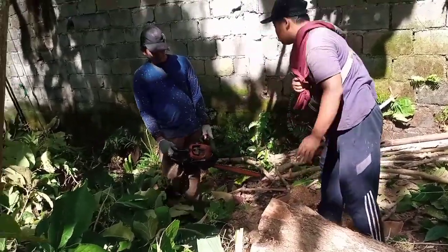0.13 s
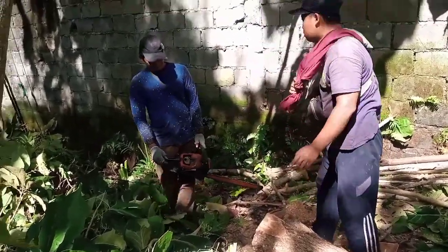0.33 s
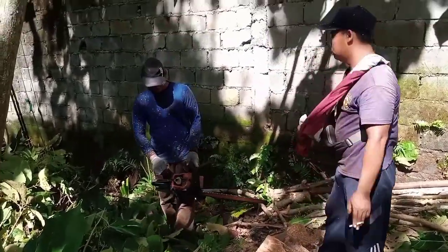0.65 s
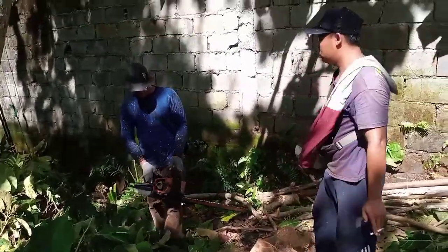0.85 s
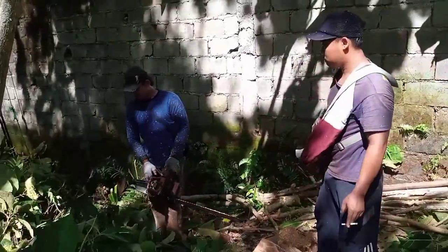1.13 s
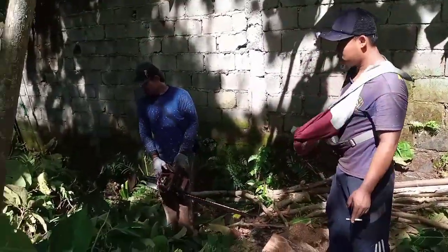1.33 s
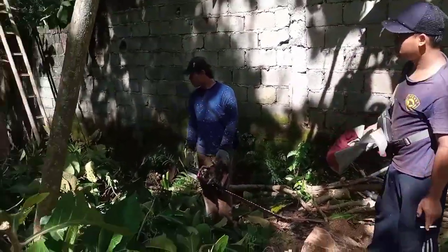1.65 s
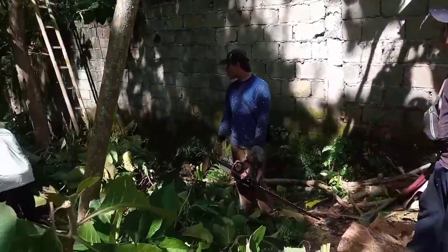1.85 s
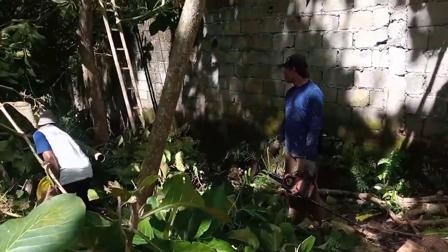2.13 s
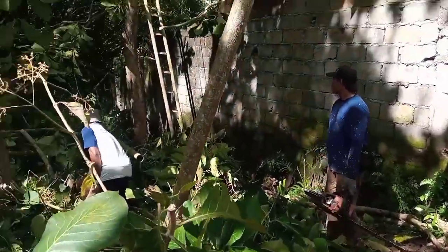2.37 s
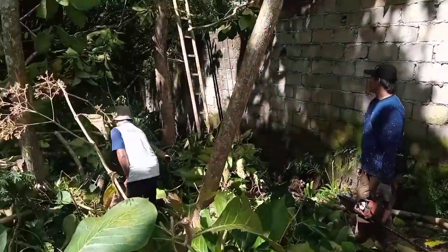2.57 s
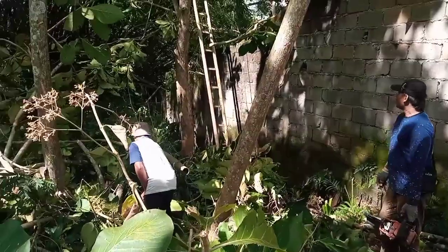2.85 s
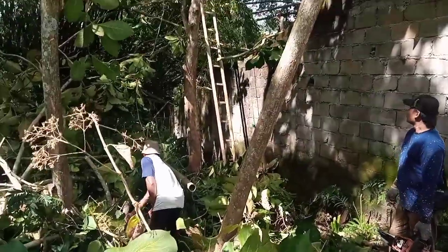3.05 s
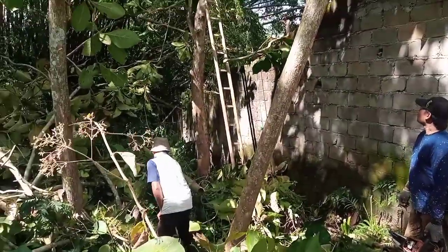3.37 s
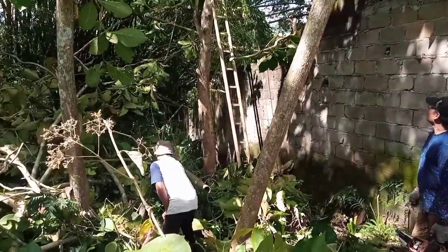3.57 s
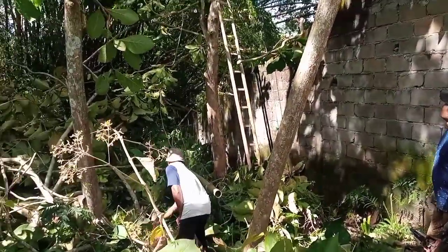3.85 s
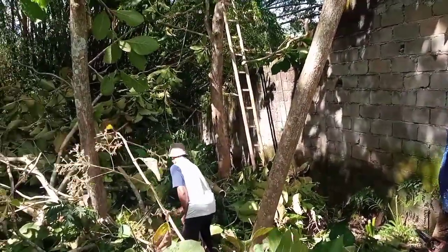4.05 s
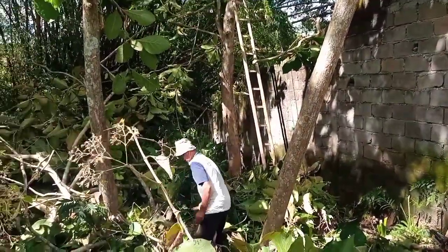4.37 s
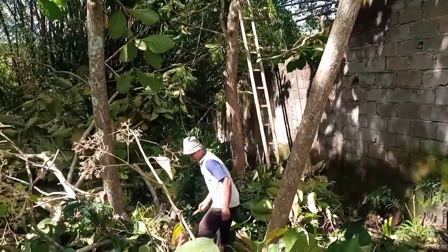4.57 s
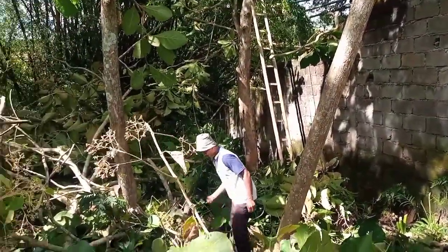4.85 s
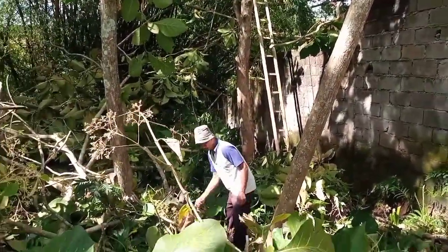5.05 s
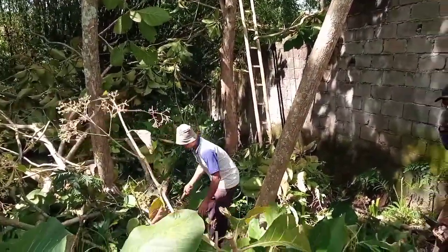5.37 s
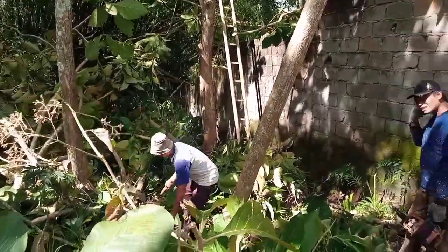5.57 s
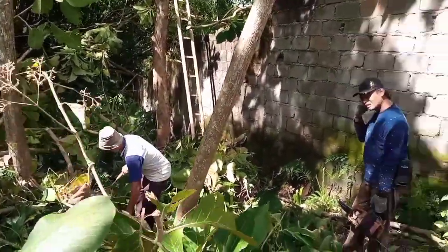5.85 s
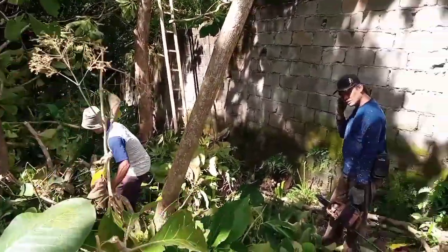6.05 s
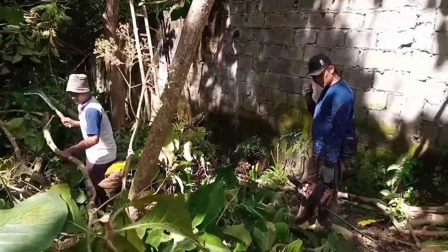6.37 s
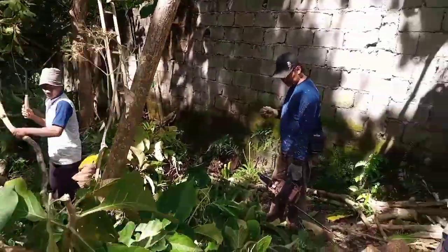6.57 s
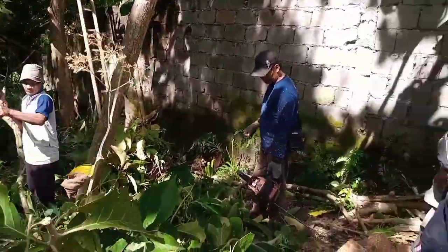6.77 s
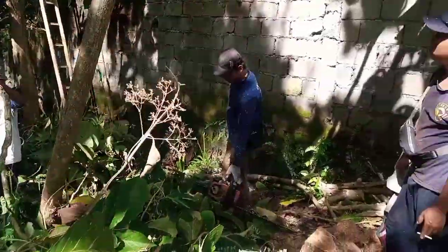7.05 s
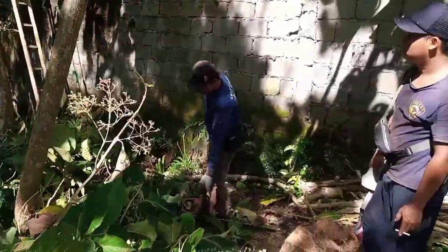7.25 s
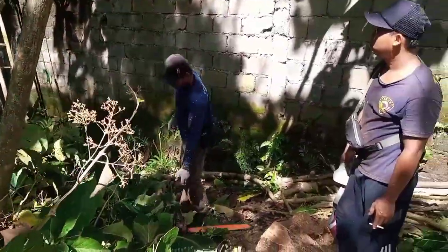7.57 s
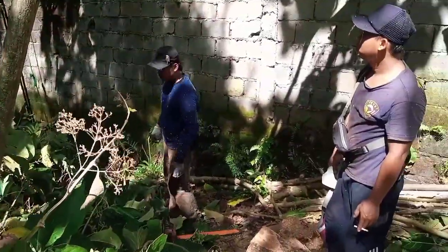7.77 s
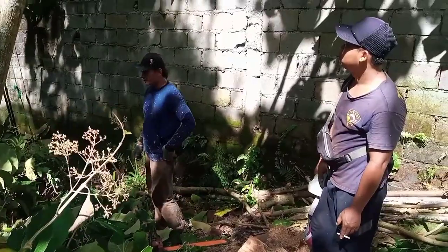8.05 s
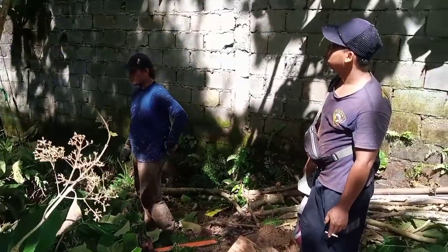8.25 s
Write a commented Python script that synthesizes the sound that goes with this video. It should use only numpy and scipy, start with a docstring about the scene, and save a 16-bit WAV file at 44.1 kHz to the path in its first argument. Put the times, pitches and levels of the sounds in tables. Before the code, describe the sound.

Rough two-stroke chainsaw idling down to silence beside a wall, followed by wooden knocks, snapping stems, leafy rustling and a steady high insect whine outdoors.

```python
"""A two-stroke chainsaw runs unevenly beside a block wall, is switched off and coasts down to a few last chuffs.
A cicada whines in slow sweeps, a far bird whistles faintly twice, and leafy brush cracks, thuds and rustles.
Each turn of the saw's crank sends pressure puffs through ringing filters; the brush is shaped noise and snaps.
Cicada and bird are gliding tones, roughened on their way through leaves. Both channels are the same."""
import sys
import numpy as np
from scipy import signal
from scipy.fft import rfft, irfft, next_fast_len
from scipy.io import wavfile
from scipy.ndimage import uniform_filter1d, map_coordinates

SR = 44100
rng = np.random.default_rng(int(sys.argv[2]) if len(sys.argv) > 2 else 0)


def digitize_waveform(pressure):
    """Quantize a signal to 16-bit integers and store it at the path in sys.argv[1].

    Rows of a 2-D input are taken as channels; values are limited to [-1, 1].
    """
    field = np.atleast_2d(pressure).T
    bounded = np.clip(field, -1, 1)
    quanta = np.round(bounded * 32767).astype(np.int16)
    wavfile.write(sys.argv[1], SR, quanta)


N = 370919
TIME = np.arange(N) / SR  # seconds

# All dB levels are relative: gains inside the functions come on top.
# "Die-away" is the time a sound takes to fall by 60 dB.

# The crank while the engine fires. Each row: time in seconds, speed in turns per second.
CRANK_SPEED = [(0, 73.4), (.62, 73.7), (1.009, 72.7)]
# Hard firings that restart the every-other-turn rhythm. Each row: time in seconds, rasp level in dB.
HARD_FIRINGS = [(.0125, -12.5), (.1075, -22), (.273, -13), (.331, -13), (.369, -51), (.450, -12),
                (.490, -46), (.626, -19.5), (.707, -19), (.749, -26), (.817, -49), (.844, -19),
                (.967, -10.5)]
# Pumping strength as the throttle closes. Each row: time in seconds, level in dB.
PUMP_LEVEL = [(.3, -12), (.9, -8), (1.06, -1.5), (1.22, 1.5), (1.37, -2.5)]
# Puffs in each turn as the ports open and close.
# Each row: place as a share of the turn, level in dB at full speed.
PORT_PUFFS = [(0, -1.5), (0.371, -1), (0.682, -11)]
# Ring of crankcase and fins. Each row: frequency in Hz, level in dB.
CASING_TONES = [(1880, -3), (2250, 0), (3260, 2.5), (3450, -3.5), (4300, -2), (4960, -6.5), (6680, -6.5)]
# How loudly the casing rings. Each row: time in seconds, level in dB.
CASING_LEVEL = [(.9, -37.5), (1.08, -33.5), (1.4, -33.5)]
# Blows in the brush. Each row: start in seconds, crack level in dB, thud level in dB,
# rustle level in dB, rustle die-away in seconds.
CHOPS = [(2.310, -17, -24, -26.5, 0.89), (2.596, -49, -28, -38, 0.97), (2.661, -50, -32.5, -49, 0.73),
         (3.055, -16, -44, -24.5, 0.55), (3.816, -14, -27, -24, 1), (5.097, -28, -47, -30.5, 0.89),
         (5.985, -24, -24, -34, 0.97), (7.389, -19.5, -25, -27, 1), (8.078, -22.5, -26, -23, 0.45),
         (8.279, -16, -22, -26, 0.94)]
# Snapping sticks and knocks on wood. Each row: start in seconds, tick level in dB,
# tick die-away in seconds, knock level in dB, knock frequency in Hz.
CLICKS = [(1.809, -25, 0.028, -12.5, 626), (1.873, -14, 0.018, 0, 490), (2.112, -26, 0.1, -51, 500),
          (3.844, -16, 0.021, -34, 850), (4.662, -35, 0.043, -20.5, 1200), (5.103, -10.5, 0.013, -9.5, 790),
          (6.16, -38, .03, -17, 2170), (5.76, -33, .04, -14, 990), (6.527, -27, 0.097, -14.5, 373),
          (8.235, -53, 0.022, -17, 156)]
# Branches pushed aside. Each row: time of the height in seconds, swell and fade length in seconds,
# leaf hiss level in dB, twig crackle level in dB.
STIRS = [(1.93, 0.2, -44.5, -44.5), (2.07, 0.025, -35, -93), (2.78, 0.16, -44, -46),
         (3.01, 0.036, -41, -45), (4.88, 0.069, -43.5, -47.5), (5.17, 0.036, -28.5, -63),
         (5.36, 0.14, -37, -48), (5.7, 0.043, -36, -54), (6.32, 0.31, -34, -38.5), (6.39, 0.03, -28, -36),
         (6.95, 0.17, -36.5, -40.5), (7.25, 0.14, -39, -41.5), (7.63, 0.29, -38.5, -45),
         (8.38, 0.058, -35, -34.5)]
# The cicada as the microphone turns towards its tree and back. Each row: time in seconds,
# fundamental level in dB, octave level in dB, top partial level in dB.
CICADA_LEVELS = [(0, -52, -58, -59), (1.0, -48, -56, -55), (1.8, -56, -56, -45), (2.27, -39, -57, -40),
                 (2.9, -45, -45, -39), (3.25, -38, -46, -37), (4.4, -39, -39.5, -35.5),
                 (5.7, -36.5, -42.5, -36.5), (6.0, -50, -49, -39), (6.6, -44, -48, -43),
                 (7.25, -47, -56, -46.5), (7.5, -42, -56, -49), (8.4, -48, -49, -47)]
# One sweep of its song. Each row: time into the sweep in seconds, pitch in Hz.
CICADA_SWEEP = [(0, 3418), (.5, 3453), (.6, 3452), (1.0, 3426), (1.47, 3402), (1.488, 3418)]
# Side tones of the cicada's sound-making ribs, the tymbal. Each row: multiple of the pitch,
# distance from it in buzz steps, level in dB against that partial.
SIDE_TONES = [(1, 1, -15), (2, -1, -20), (2, -2, -20), (4, -1, -15), (4, 1, -18)]
# Song arriving by way of swaying leaves. Each row: multiple of the pitch, scattered over direct sound in dB.
LEAF_SCATTER = [(1, -17), (2, -12), (4, -6)]
# Whistles of a far bird. Each row: start in seconds, length in seconds, first pitch in Hz,
# last pitch in Hz, level in dB, speed of the random blur in Hz.
BIRD_CALLS = [(2.18, 0.14, 2750, 2400, -51, 450), (3.337, 0.3, 3100, 2350, -49, 450)]

# Spectra of the sounds. Each row: frequency in Hz, density in dB per Hz (only the shape counts).
FIRING_SPECTRUM = [(60, -67), (100, -26.5), (165, -12.5), (250, -10.5), (292, -7.5), (345, -18), (465, 2),
                   (540, -13), (800, 1.5), (900, -3.5), (1050, -3.5), (1700, -28), (9000, -65)]
PUMPING_SPECTRUM = [(45, -57), (175, -7), (420, 0.5), (590, -11.5), (735, 6), (810, -7.5), (880, 0.5),
                    (1100, -8), (1750, -23.5), (9000, -56)]
SHOVE_SPECTRUM = [(55, -48), (105, -8), (170, 5), (1500, -58)]
CHUFF_SPECTRUM = [(45, -54.5), (130, -5), (400, -2.5), (550, -16), (860, -0.5), (1300, -23.5),
                  (12000, -46.5)]
METAL_SPECTRUM = [(300, 0), (1300, 5), (2250, 3.5), (2800, -5), (3400, 3.5), (6800, -1), (13000, -23.5)]
CHAIN_SPECTRUM = [(1300, -22), (2200, 3), (3900, -8), (4400, 7), (5000, -6), (6000, -35.5)]
JINGLE_SPECTRUM = [(1000, -5.5), (4500, -8.5), (6300, 1), (13000, -30.5)]
CRACK_SPECTRUM = [(400, -10.5), (900, 1.5), (6700, 6.5), (8500, -3), (15000, -30)]
THUD_SPECTRUM = [(35, -51), (80, -0.5), (150, 1.5), (330, -3.5), (520, -16), (900, -4.5), (4000, -49.5)]
LEAF_SPECTRUM = [(500, -49.5), (1800, -4.5), (4500, -1), (6600, 5), (10000, -17), (15000, -23.5)]
TWIG_SPECTRUM = [(100, -35), (230, -1), (2200, 0.5), (7000, -24)]
RUMBLE_SPECTRUM = [(25, -65), (50, -6), (120, 1.5), (330, -2.5), (480, -25), (4000, -23.5)]
# Echo between trunks and masonry. Each row: frequency in Hz, die-away in seconds.
YARD_DECAY = [(150, 0.49), (8000, 0.068)]

# Once the ignition is cut, friction brakes the crank evenly.
CUT_S, BRAKE_HZ_PER_S = 1.009, 97.4
# Slow hunting and turn-to-turn scatter of the crank while it fires.
HUNT_TURNS, JITTER_TURNS = .028, .011
# Levels of combustion, plain pumping, the late shoves of gas and the hiss of each firing.
FIRING_DB, PUMPING_DB, SHOVE_DB, SPIT_DB = -19, -22.5, -33.5, -32.5
# Turbulence in a firing, against its clean pressure spike.
FIRING_ROUGH = .45
# The slower the piston, the more gas each stroke shoves: power of the slowness.
SHOVE_POWER = 2.1
# The muffler's resonances sink as its gas cools: share lost per second while firing.
COOLING_PER_S = 0.028
# The wall's echo comes later and later as the saw is moved.
WALL_S, WALL_DRIFT_S_PER_S = 0.00615, 0.00049
# Piston clatter at full speed, and the power of the speed it follows.
CLATTER_DB, CLATTER_POWER = -30.5, 0.23
# The chain runs on round the bar at first: level, when it stops, how long the fade takes.
CHAIN_DB, CHAIN_STOP_S, CHAIN_FADE_S = -26, 0.27, 0.16
# Last compression strokes: the first, the gap after it, each gap over the one before.
CHUFF_S, CHUFF_GAP_S, CHUFF_SLOWING = 1.399, .035, 1.198
# The first puff, and what each later stroke loses.
PUFF_DB, PUFF_LOSS_DB = -10, 0.75
# Jingle on the third stroke, its rise per stroke up to there and fall per stroke after.
JINGLE_DB, JINGLE_RISE_DB, JINGLE_FALL_DB = -20.5, 4.5, 3
# Leaves that never quite settle, and unevenness of the stirred brush and of the shaken foliage.
LEAF_FLOOR_DB, FITS_DB, TAIL_FITS_DB = -47.5, 1.5, 1.1
# How far single leaves and twigs stand out in the rustle.
PATCHY_DB, TWIG_PATCHY_DB = 1.5, 2.4
# Start of a cicada sweep; how fast its scattered paths change;
# dB more scatter for each dB the top partial loses.
SWEEP_START_S, FADING_HZ, OFF_AXIS_SHARE = .155, 13, .45
# How long far sounds linger among the trees; upper limit of the finished sound.
GROVE_T60_S, TOP_HZ = .7, 15700


def engine():
    """Every turn pumps puffs through the muffler; about every other turn fires, until the ignition is cut."""
    speed, turns, turn, ignition, angle, strokes = crank()
    fires, lit = firing_pattern(turns, turn, ignition)
    # sound travels more slowly in cooler gas, so the muffler rings on a slowing clock
    clock = np.cumsum(1 - COOLING_PER_S * np.minimum(TIME, CUT_S)) / SR
    slowness = speed[0] / np.interp(strokes, TIME, speed)
    bark = combustion(strokes, fires, clock)
    pump = pumping(angle, turns, strokes, ignition, slowness, clock)
    shove = colour(impulses(strokes, ~ignition * slowness ** SHOVE_POWER), SHOVE_SPECTRUM)
    exhaust = amp(FIRING_DB) * unit(bark) + amp(PUMPING_DB) * unit(pump) + amp(SHOVE_DB) * unit(shove)
    running_share = strokes[-1] * SR / N  # part of the scene in which the crank turns
    gas_and_casing = np.sqrt(running_share) * (exhaust + casing(turn, turns))
    return gas_and_casing + clatter(speed, turns, strokes[lit & ignition])


def crank():
    """Follow the crank: firing, it hunts and no two turns are alike; coasting, it slows smoothly."""
    braking = BRAKE_HZ_PER_S * np.maximum(TIME - CUT_S, 0)
    speed = np.maximum(curves(CRANK_SPEED)[0] - braking, 0)
    turns = np.cumsum(speed) / SR + .05
    last_turn = int(np.interp(CHUFF_S - CHUFF_GAP_S / 2, TIME, turns))
    turn = np.arange(1, last_turn + 1)
    ignition = np.interp(turn, turns, TIME) < CUT_S + .5 / speed[0]
    hunting = HUNT_TURNS * wobble(11)[(turn * SR / speed[0]).astype(int)]
    jitter = JITTER_TURNS * rng.standard_normal(len(turn))
    angle = turn + ignition * (hunting + jitter)
    strokes = np.interp(angle, turns, TIME)  # seconds
    return speed, turns, turn, ignition, angle, strokes


def firing_pattern(turns, turn, ignition):
    """A hard firing follows a miss; then each firing needs one turn to clear its burnt gas."""
    hard_turn = np.round(np.interp([s for s, _ in HARD_FIRINGS], TIME, turns))
    latest = np.maximum(np.searchsorted(hard_turn, turn, "right") - 1, 0)
    since = turn - hard_turn[latest]
    lit = (since % 2 == 0) & ~np.isin(turn + 1, hard_turn)
    weak = .26 * amp(2.5 * rng.standard_normal(len(turn)))
    fires = ignition * np.where(lit, 1, weak) * amp(rng.standard_normal(len(turn)))
    return fires, lit


def combustion(strokes, fires, clock):
    """Pressure spikes of the firings ring the muffler and bounce off the wall."""
    spikes = puffs(np.interp(strokes, TIME, clock), fires, rough=FIRING_ROUGH)
    bark = np.interp(clock, TIME, colour(spikes, FIRING_SPECTRUM))
    bark = baffle(bark, hz=950, q=1.65)
    bark = wall(bark, delay=WALL_S + WALL_DRIFT_S_PER_S * TIME, echo_db=-6)
    return yard(bark, wet_db=-9)


def pumping(angle, turns, strokes, ignition, slowness, clock):
    """As the throttle closes, plain pumping takes over; its weaker puffs fade most as the crank slows."""
    gas = amp(np.interp(strokes, *np.transpose(PUMP_LEVEL)))
    ports = np.zeros(N)
    for share, db in PORT_PUFFS:
        scatter = amp(np.where(ignition, 2, .6) * rng.standard_normal(len(angle)))
        times = np.interp(angle + share, turns, clock)
        ports += impulses(times, gas * amp(db * slowness) * scatter)
    ringing = colour(chamber(ports, hz=423, feedback=0.44), PUMPING_SPECTRUM)
    pump = np.interp(clock, TIME, ringing)
    return yard(baffle(pump, hz=600, q=.9), wet_db=-14)


def puffs(times, sizes, rough):
    """Pressure spikes, each with a short wake of turbulent gas."""
    spikes = impulses(times, sizes)
    decay = np.exp(-1 / (0.006 * SR))
    wake = signal.lfilter([1], [1, -decay], spikes) * rng.standard_normal(N)
    return spikes + rough * wake * np.linalg.norm(spikes) / np.linalg.norm(wake)


def chamber(x, hz, feedback):
    """Sound runs to and fro in the muffler can, so that it rings on between puffs."""
    loop = np.zeros(round(SR / hz))
    loop[0], loop[-1] = 1, -feedback
    return signal.lfilter([1], loop, x)


def baffle(x, hz, q):
    """The muffler turns over the band round its resonance, so each puff swells for a cycle or two."""
    return x - 2 * signal.lfilter(*signal.iirpeak(hz, q, SR), x)


def casing(turn, turns):
    """Knocks at the same crank angles in every turn ring the metal, so fine overtones glide with the crank."""
    tones = sum(amp(db) * np.sin(2 * np.pi * hz * TIME) for hz, db in CASING_TONES)
    ring = burst(0, .0001, 0.029) * tones
    knocks = np.zeros(N)
    for share in (0, .21, .47, .76):
        sizes = amp(rng.standard_normal(len(turn)))
        knocks += impulses(np.interp(turn + share, turns, TIME), sizes)
    return amp(curves(CASING_LEVEL)[0]) * unit(signal.oaconvolve(knocks, ring[:SR])[:N])


def clatter(speed, turns, firing_times):
    """Piston and chain rattle once a turn; every regular firing spits, and hard firings rasp."""
    slap = unit(1 + np.exp(-(turns % 1) / 1.5))
    fade = np.clip((CHUFF_S - TIME) * 10 + 1, 0, 1)
    rattle = amp(CLATTER_DB) * (speed / speed[0]) ** CLATTER_POWER * slap * fade
    spit = amp(SPIT_DB) * sum(burst(s, 0.0004, 0.02) for s in firing_times)
    rasp = sum(amp(db) * burst(s, 0.00052, 0.034) for s, db in HARD_FIRINGS)
    grains = crackle(rate=1700, share=0.33, clump_db=1.3)
    metal = colour((rattle + spit + 0.66 * rasp) * grains, METAL_SPECTRUM)
    return metal + colour(1.13 * rasp * rng.standard_normal(N), CHUFF_SPECTRUM)


def chain():
    """The chain sings along the bar until the clutch lets go."""
    running = np.clip((CHAIN_STOP_S - TIME) / CHAIN_FADE_S, 0, 1)
    singing = colour(crackle(rate=1400, share=0.71, clump_db=1.5), CHAIN_SPECTRUM)
    return amp(CHAIN_DB) * running * singing


def last_strokes(thump_hz=170, count=6):
    """The piston labours over compression a few more times, thumps the muffler and jerks the loose chain."""
    stroke = np.arange(count)
    times = CHUFF_S + CHUFF_GAP_S * (CHUFF_SLOWING ** stroke - 1) / (CHUFF_SLOWING - 1)
    puff_db = PUFF_DB - PUFF_LOSS_DB * stroke
    thump_db = puff_db + 2.5 - stroke
    jingle_db = JINGLE_DB - np.maximum(JINGLE_RISE_DB * (2 - stroke), JINGLE_FALL_DB * (stroke - 2))
    push = sum(amp(db) * burst(s, 0.0066, 0.045) for s, db in zip(times, puff_db))
    thump = sum(amp(db) * burst(s, 0.0048, 0.046) * np.sin(2 * np.pi * thump_hz * (TIME - s))
                for s, db in zip(times, thump_db))
    jerk = sum(amp(db) * burst(s, 0.00099, 0.36) for s, db in zip(times, jingle_db))
    gas = colour(1.74 * push * rng.standard_normal(N), CHUFF_SPECTRUM)
    jingle = colour(0.5 * jerk * crackle(rate=1600, share=0.31, clump_db=1.5), JINGLE_SPECTRUM)
    return wall(gas + 1.6 * thump, delay=0.0083, echo_db=-8.5) + jingle


def chops():
    """Stems crack, the ground thuds and the shaken leaves go on rustling."""
    crack = sum(amp(db) * burst(s, 0.002, 0.066) for s, db, _, _, _ in CHOPS)
    thud = sum(amp(db) * burst(s + 0.00032, 0.0027, 0.2) for s, _, db, _, _ in CHOPS)
    shake = sum(amp(db) * burst(s, 0.008, t60) for s, _, _, db, t60 in CHOPS)
    stems = colour(1.27 * crack * crackle(rate=590, share=0.15, clump_db=-0.5), CRACK_SPECTRUM)
    ground = colour(1.14 * thud * rng.standard_normal(N), THUD_SPECTRUM)
    leaves = colour(shake * crackle(rate=1400, share=0.12, clump_db=1.2), LEAF_SPECTRUM)
    twigs = colour(amp(-8) * shake * crackle(rate=370, share=0.13, clump_db=3.5), TWIG_SPECTRUM)
    rustle = amp(TAIL_FITS_DB * wobble(35)) * patchy(leaves + twigs, PATCHY_DB)
    low_shake = colour(amp(-12) * shake * rng.standard_normal(N), THUD_SPECTRUM)
    return stems + ground + rustle + low_shake


def clicks(cycles=4.2):
    """A dry tick over a wooden knock that dies within a few cycles."""
    ticks = sum(amp(db) * burst(s, 0.00052, t60) for s, db, t60, _, _ in CLICKS)
    knocks = sum(amp(db) * burst(s, 0.00085, cycles / hz) * np.sin(2 * np.pi * hz * (TIME - s))
                 for s, _, _, db, hz in CLICKS)
    return colour(ticks * crackle(rate=1300, share=0.3, clump_db=1.5), CRACK_SPECTRUM) + knocks


def undergrowth():
    """Each pushed branch swells and fades: leaves brush past each other and dry twigs crackle, in uneven fits."""
    hiss_power, snap_power = amp(LEAF_FLOOR_DB) ** 2, 0
    for s, length, hiss_db, snap_db in STIRS:
        swell = np.exp(-np.abs((TIME - s) / length) ** 1.64)
        hiss_power = hiss_power + amp(hiss_db) ** 2 * swell
        snap_power = snap_power + amp(snap_db) ** 2 * swell
    fits = FITS_DB * wobble(22)
    hiss = colour(crackle(rate=650, share=0.2, clump_db=1.14), LEAF_SPECTRUM)
    snaps = colour(crackle(rate=300, share=0.27, clump_db=1.5), TWIG_SPECTRUM)
    leaves = np.sqrt(hiss_power) * amp(fits) * hiss
    twigs = np.sqrt(snap_power) * amp(fits + 2.1 * wobble(15)) * snaps
    return patchy(leaves, PATCHY_DB) + patchy(twigs, TWIG_PATCHY_DB)


def cicada():
    """A whine sweeps up and sags, with side tones of a fast buzz; direct and scattered paths beat and flutter."""
    into = (TIME - SWEEP_START_S) % CICADA_SWEEP[-1][0]
    pitch = np.interp(into, *np.transpose(CICADA_SWEEP)) * (1 + .0003 * wobble(80))
    phase = 2 * np.pi * np.cumsum(pitch) / SR
    buzz = phase * 323 / 3451  # about 323 Hz, following the pitch
    levels = curves(CICADA_LEVELS)
    lost_db = levels[-1].max() - levels[-1]
    song = np.zeros(N)
    for (multiple, scatter_db), level_db in zip(LEAF_SCATTER, levels):
        scatter = amp(scatter_db + OFF_AXIS_SHARE * lost_db)
        fading = wobble(FADING_HZ) + 1j * wobble(FADING_HZ)
        paths = (1 + scatter * fading) / np.sqrt(1 + 2 * scatter ** 2)
        sides = sum(amp(db) * np.exp(1j * step * buzz) for k, step, db in SIDE_TONES if k == multiple)
        partial = np.imag(paths * (1 + sides) * np.exp(1j * multiple * phase))
        song += np.sqrt(2) * amp(level_db + wobble(110) + wobble(2000) / 2) * partial
    return song * (1 - np.exp(-(into / 0.01) ** 2))  # a tiny break before each sweep


def bird():
    """Distant falling whistles, blurred, broken up and drawn out by the trees."""
    song = np.zeros(N)
    for s, length, from_hz, to_hz, db, blur_hz in BIRD_CALLS:
        progress = np.clip((TIME - s) / length, 0, 1)
        pitch = from_hz + (to_hz - from_hz) * progress
        blur = wobble(blur_hz) * amp(3.5 * wobble(30))
        whistle = np.sin(2 * np.pi * np.cumsum(pitch) / SR)
        song += amp(db) * blur * np.sin(np.pi * progress) * whistle
    tail = burst(0, .01, GROVE_T60_S)[:SR] * rng.standard_normal(SR)
    return song + 1.6 * signal.oaconvolve(song, tail / np.linalg.norm(tail))[:N]


def air(level_db=-49):
    """A low outdoor rumble of filtered noise, gently uneven."""
    return amp(level_db + 0.3 * wobble(4.5)) * colour(rng.standard_normal(N), RUMBLE_SPECTRUM)


def wall(x, delay, echo_db):
    """Add one reflection, delay seconds late."""
    return x + amp(echo_db) * np.interp(TIME - delay, TIME, x, left=0)


def yard(x, wet_db):
    """Add the short diffuse answer of trunks and masonry: noise whose treble dies sooner."""
    hz, t, z = signal.stft(rng.standard_normal(SR // 2), SR, nperseg=256)
    decay = np.exp(-np.log(1000) * t / along(YARD_DECAY, hz)[:, None])
    tail = signal.istft(z * decay, SR, nperseg=256)[1]
    late = np.pad(x, (SR // 100, 0))  # the answer starts 10 ms late
    return x + amp(wet_db) * signal.oaconvolve(late, tail / np.linalg.norm(tail))[:N]


def patchy(x, depth_db):
    """Every leaf and twig has its own pitch: short patches of the spectrum stand out at random."""
    z = signal.stft(x, nperseg=1024)[2]
    field = uniform_filter1d(rng.standard_normal(z.shape), size=7, axis=0)
    field = uniform_filter1d(field, size=3, axis=1)
    gain = amp(depth_db * unit(field))
    return signal.istft(z * unit(gain), nperseg=1024)[1][:N]


def crackle(rate, share, clump_db):
    """Noise of rms 1, a share of its power in tiny snaps (rate per second), bunched in clumps."""
    snaps = unit((rng.random(N) < rate / SR) * rng.standard_normal(N))
    mix = np.sqrt(share) * snaps + np.sqrt(1 - share) * rng.standard_normal(N)
    return unit(mix * amp(clump_db * wobble(90)))


def burst(start, rise, t60):
    """An envelope that swells quickly and dies away by 60 dB in t60 seconds."""
    envelope = np.zeros(N)
    first = max(int(start * SR), 0)
    t = TIME[:min(int(2 * t60 * SR), N - first)]
    envelope[first:first + len(t)] = (1 - np.exp(-t / rise)) * np.exp(-np.log(1000) * t / t60)
    return envelope


def impulses(times, sizes):
    """A spike of each size at each time in seconds."""
    return np.bincount(np.clip(np.round(times * SR).astype(int), 0, N - 1), sizes, N)


def colour(x, spectrum, size=8192):
    """Pass x through a filter of unit energy and the given spectrum that never rings ahead of the sound."""
    cepstrum = irfft(np.log(amp(along(spectrum, np.fft.rfftfreq(size, 1 / SR)))))
    # folding the cepstrum puts the ring after the impulse (minimum phase)
    cepstrum[1:size // 2] *= 2
    cepstrum[size // 2 + 1:] = 0
    ring = irfft(np.exp(rfft(cepstrum)))
    return signal.oaconvolve(x, ring / np.linalg.norm(ring))[:N]


def wobble(rate):
    """A smooth random curve with rate random points a second."""
    return map_coordinates(rng.standard_normal(int(N * rate / SR) + 4), [TIME * rate])


def curves(rows):
    """One value per sample for each column after the time."""
    s, *columns = np.transpose(rows)
    return [np.interp(TIME, s, column) for column in columns]


def along(points, hz):
    """Read a table of frequency and value on a log frequency axis."""
    f, v = np.transpose(points)
    return np.interp(np.log(hz + 1), np.log(f + 1), v)


def unit(x):
    """Scale to rms 1."""
    return x / np.sqrt(np.mean(x ** 2) + 1e-20)


def amp(db):
    """Turn decibels into a gain."""
    return 10 ** (np.asarray(db) / 20)


def scene():
    """Saw, brush work and wildlife, the same in both channels."""
    saw = engine() + chain() + yard(last_strokes(), wet_db=-19)
    work = yard(chops() + clicks(), wet_db=-16.5)
    mono = saw + work + undergrowth() + cicada() + bird() + air()
    return np.array([mono, mono])


def record(dry):
    """Peaks are rounded off softly, the deep bass is thinned out and all above the band limit is removed."""
    soft = dry / (1 + np.abs(dry / .6) ** 6) ** (1 / 6)
    size = next_fast_len(N + SR // 2)
    hz = np.fft.rfftfreq(size, 1 / SR)
    band = (hz < TOP_HZ) * (1 - np.exp(-(hz / 28) ** 2))
    return irfft(rfft(soft, size) * band, size)[:, :N]


dry = scene()
out = record(dry)
digitize_waveform(out)
```